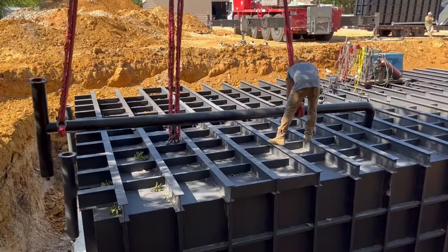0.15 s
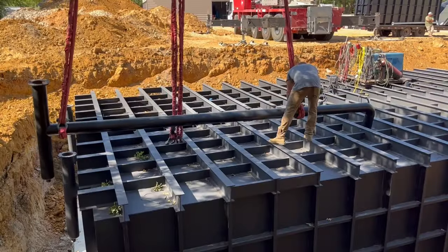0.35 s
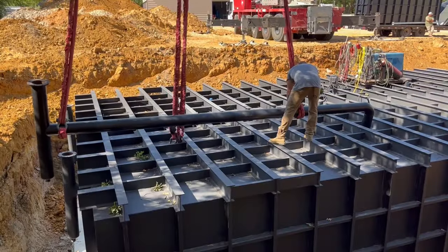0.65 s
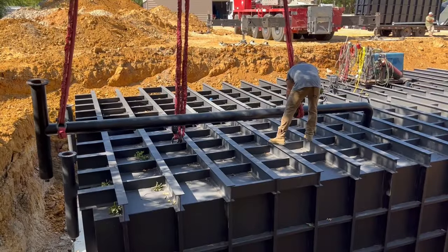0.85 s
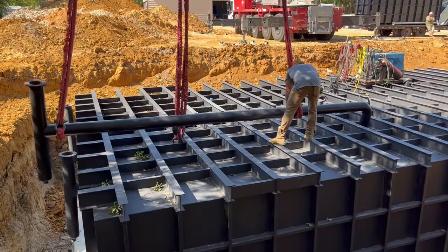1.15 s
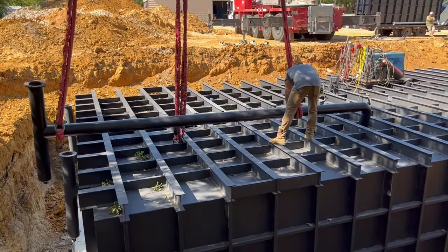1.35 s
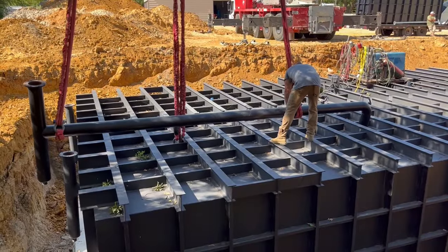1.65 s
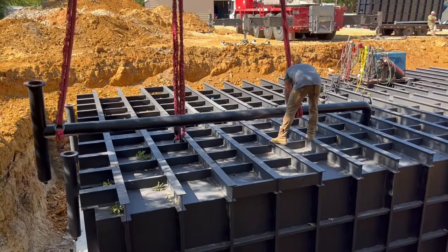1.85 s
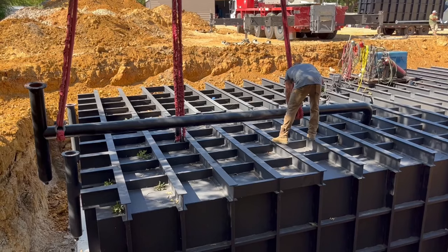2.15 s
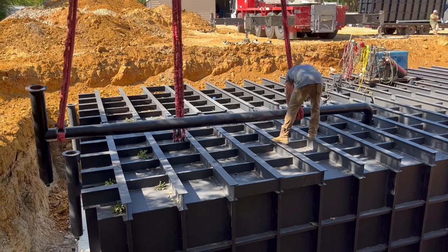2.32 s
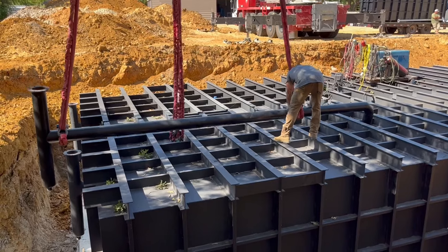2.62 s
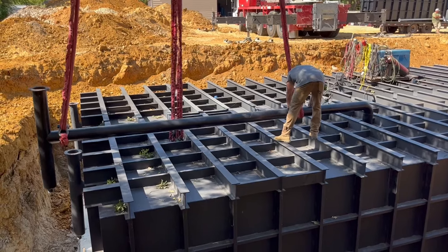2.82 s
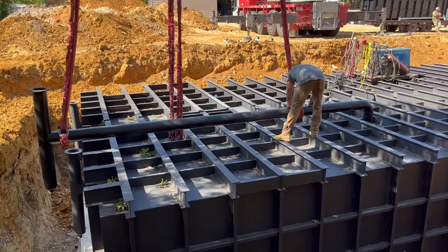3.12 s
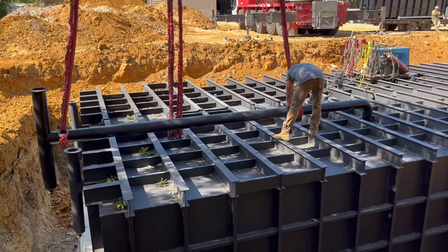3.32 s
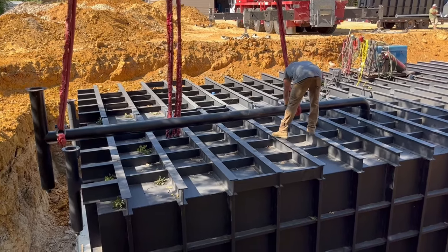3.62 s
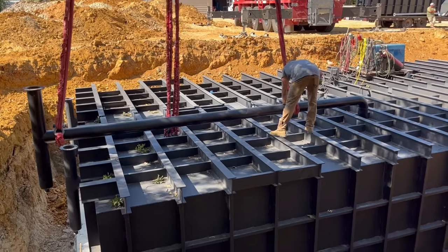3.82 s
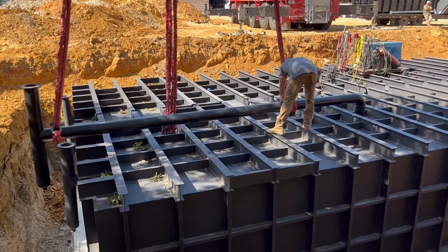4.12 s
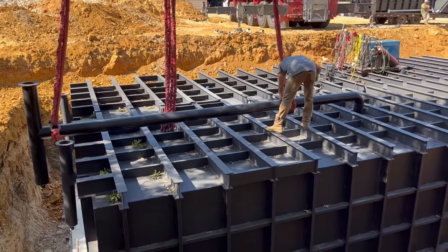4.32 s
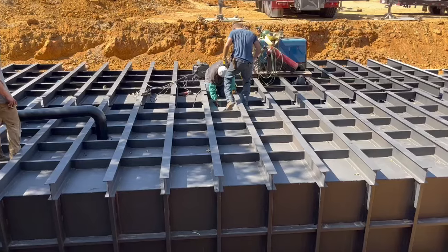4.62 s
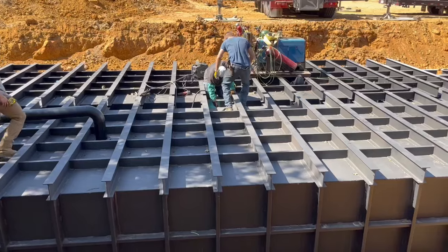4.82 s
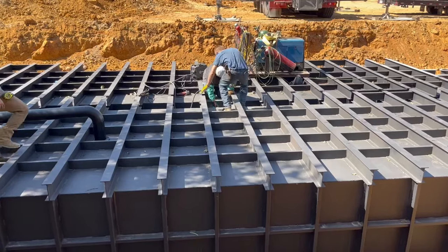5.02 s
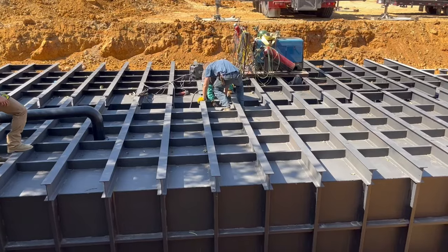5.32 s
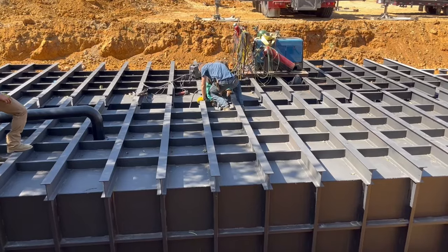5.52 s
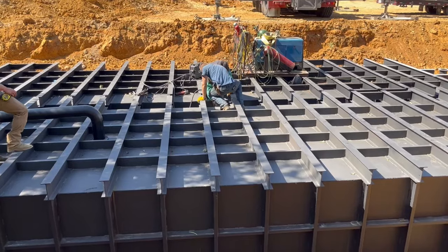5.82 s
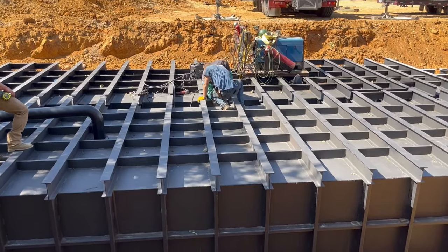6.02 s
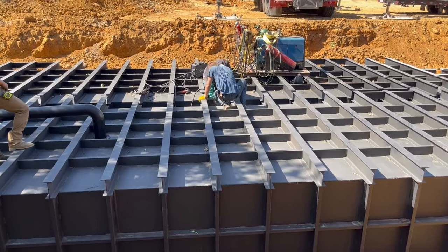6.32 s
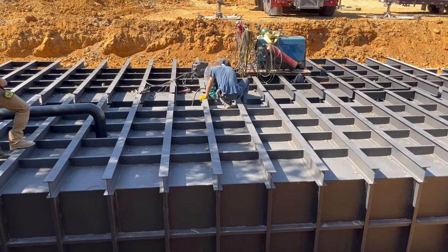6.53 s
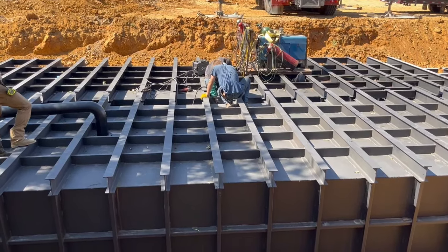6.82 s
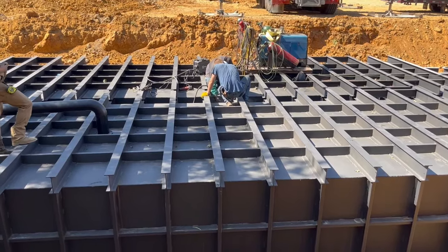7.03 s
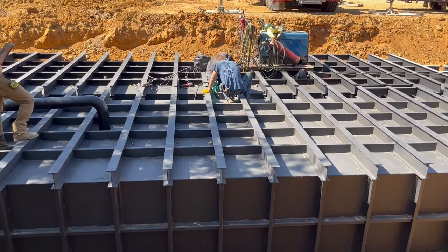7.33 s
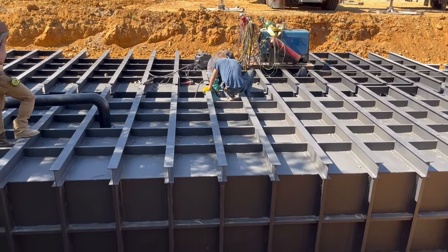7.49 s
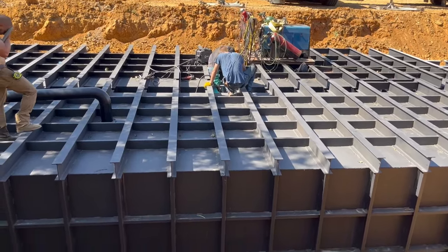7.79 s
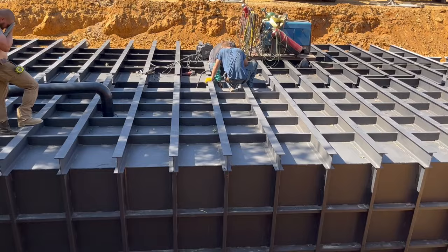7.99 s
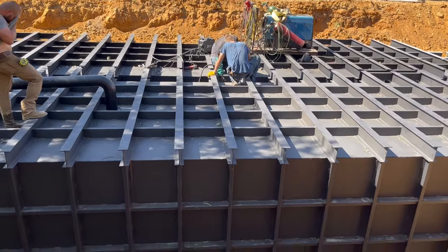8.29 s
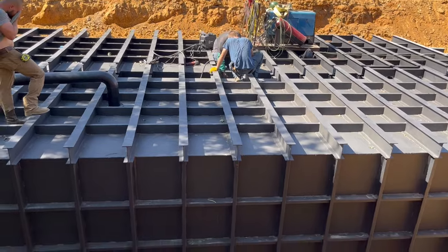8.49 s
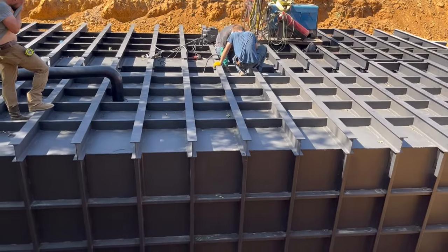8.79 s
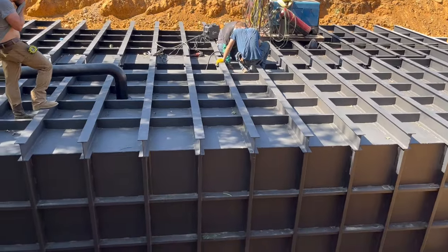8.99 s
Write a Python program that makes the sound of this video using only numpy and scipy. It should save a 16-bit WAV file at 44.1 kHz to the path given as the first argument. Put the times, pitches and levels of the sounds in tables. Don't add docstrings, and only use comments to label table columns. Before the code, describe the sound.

Outdoors in an earth pit, two engines idle steadily across the way while a chain clanks brightly and steel beams bump, with a heavier cluster of hollow thuds a couple of seconds later. A hard cut moves nearer a whining welding generator and crane engine; an arc sputters and pops, stops, resumes for a second bead, and ends with a loud snap. Handheld phone, stereo, little bass or extreme treble.

```python
import sys
import numpy as np
from scipy import signal
from scipy.fft import rfft, irfft
from scipy.io import wavfile
from scipy.ndimage import uniform_filter1d

SR = 44100
rng = np.random.default_rng(int(sys.argv[2]) if len(sys.argv) > 2 else 0)


def log_audio(samples):
    frames = np.atleast_2d(samples).T
    limited = np.clip(frames, -1, 1)
    pcm = np.round(limited * 32767).astype(np.int16)
    wavfile.write(sys.argv[1], SR, pcm)


def linear_from_db(decibels):
    return 10 ** (np.asarray(decibels, float) / 20)


N = 403515
T = np.arange(N) / SR
HZ = np.fft.rfftfreq(N, 1 / SR)
SCENE_CHANGE_S = 4.446


def level(x, db):
    return x * linear_from_db(db) / np.sqrt(np.mean(x ** 2))


def on_log(table):
    hz, value = np.transpose(table)
    return np.interp(np.log(HZ + 1), np.log(hz + 1), value)


def bells(modes):
    return 1 + sum(linear_from_db(db) * 1j * HZ * width / (hz ** 2 - HZ ** 2 + 1j * HZ * width)
                   for hz, width, db in modes)


def walk(rate):
    hold = int(SR / rate)
    steps = np.repeat(rng.standard_normal(N // hold + 1), hold)
    return 1.3 * uniform_filter1d(uniform_filter1d(steps, hold), hold)[:N]


def tone(phase, db, sway_db, drift):
    strength = np.sqrt(2) * linear_from_db(db + sway_db * walk(5))
    return strength * np.sin(phase + drift * walk(4) + 2 * np.pi * rng.random())


def place(starts, sounds):
    out = np.zeros(N + SR)
    for start, sound in zip(starts, sounds):
        first = int(start * SR)
        out[first:first + len(sound)] += sound
    return out[:N]


def die_away(t, t60):
    return np.exp(-np.log(1000) * t / t60)


def burst(t, t60):
    return rng.standard_normal(len(t)) * die_away(t, t60)


def ring(modes, longest, t, scatter=1):
    hz, db, t60 = np.transpose(modes)[:, :, None]
    share_db, detune, phase = rng.standard_normal((3, len(modes), 1))
    swing = np.sin(2 * np.pi * hz * (1 + 0.00094 * detune) * t + scatter * phase)
    y = np.sum(linear_from_db(db + share_db) * die_away(t, np.minimum(t60, longest)) * swing, axis=0)
    return y / np.max(np.abs(y))


def roar(table, covers, db, turn, beat):
    spectrum = rfft(rng.standard_normal((2, N))) * linear_from_db(on_log(table)) * bells(covers)
    puff = 1 + beat * np.cos(2 * turn) + .5 * beat * np.cos(turn + 1)
    out = 0
    for hz in 45 * 2 ** np.arange(9):
        band = np.cos(np.pi / 2 * np.clip(np.log2((HZ + 1) / hz), -1, 1)) ** 2
        out = out + irfft(spectrum * band, N) * linear_from_db(walk(6)) * puff ** min(700 / hz, 1)
    return level(out, db)


# multiple of the shaft turn, level in dB.
FAR_ORDERS = [(2, 2), (3, -8), (4, -34), (5, -1), (6, -2.5), (7, -13.5), (8, -11), (10, -10.5), (11, -11.5),
              (12, -11.5), (13, -22.5), (14, -16.5), (15, -19), (16, -27), (18, -8.5), (19, -23.5),
              (23, -21.5), (24, -13.5), (25, -11.5), (26, -13), (27, -11), (28, -16), (29, -10),
              (31, -15.5), (32, -16.5), (33, -14.5), (36, -18.5), (38, -14)]
# frequency in Hz, level in dB.
CRANE_FAR = [(53.25, -35), (1055, -44), (1147, -51.5), (1420, -48.5), (1815, -51.5)]
# frequency in Hz, level in dB per Hz.
FAR_ROAR = [(30, -6), (70, 5.5), (120, 0), (230, -4), (370, -2.5), (480, -8), (650, -8), (900, -4),
            (1300, -16.5), (2100, -23.5), (3300, -26.5), (4400, -32), (8000, -29.5), (14500, -35.5)]
# frequency in Hz, width in Hz, level in dB.
FAR_COVERS = [(1545, 150, 7.5), (1843, 41, 8), (2660, 730, 3), (4430, 490, 5), (6730, 410, -19)]


def far_spot():
    turn = 2 * np.pi * 30.21 * T
    lines = sum(tone(round(k) * turn, db - 32, 0.85, 0.011 * k) for k, db in FAR_ORDERS)
    crane = sum(tone(2 * np.pi * hz * T, db, 0.15, 0.12) for hz, db in CRANE_FAR)
    return lines + crane, roar(FAR_ROAR, FAR_COVERS, -28.5, turn, 0.17)


# time in seconds, pitch of the slot whine in Hz.
SPEED = [(4.46, 528), (5.14, 528.4), (5.26, 543), (5.4, 542), (6.2, 545.7), (6.3, 545), (7.04, 546.4),
         (7.21, 523.2), (7.33, 520.3), (7.46, 530.4), (8.26, 532.3), (8.33, 534), (8.43, 545),
         (9.03, 544.2), (9.11, 538), (9.15, 522)]
# time in seconds, load from 0 to 1.
LOAD = [
    (4.45, 1),
    (5.2, 0.97),
    (5.45, 0.36),
    (5.8, 0.28),
    (7.05, 0.11),
    (7.25, 0.77),
    (8.3, 1),
    (8.5, 0.38),
    (9.0, 0.29),
    (9.15, 0.46),
]
# multiple of the shaft turn, idle level in dB, gain at full load in dB.
NEAR_ORDERS = [(3, -60, 14), (4, -46, 2.5), (5, -28.5, 6), (6, -29.5, 6.5), (7, -42, 3), (8, -42.5, -3),
               (9.993, -65, -9), (22, -40.5, -7), (25, -43.5, 1), (28, -51, -9), (36, -44, -6.5),
               (51, -43, -5), (57, -51.5, -2.5)]
# frequency in Hz, level in dB.
CRANE_NEAR = [(76.7, -32.5), (87.8, -42), (134.2, -39.5), (153.4, -33.5), (383.2, -40), (1035, -45),
              (2070, -49)]
# frequency in Hz, level in dB per Hz.
NEAR_ROAR = [(30, -10), (70, -13), (105, -6), (200, -7), (400, -7), (620, -6), (850, -15), (1050, -12),
             (1300, -19.5), (2000, -20), (3300, -26.5), (4400, -33), (8000, -33.5), (14500, -37.5)]
# frequency in Hz, width in Hz, level in dB.
NEAR_COVERS = [(1417, 136, 2.5), (2060, 980, -18.5), (4430, 800, 4.5), (7340, 540, -19.5)]


def near_spot():
    slots = 18
    turn = np.cumsum(2 * np.pi * np.interp(T, *np.transpose(SPEED)) / slots / SR)
    load = np.clip(np.interp(T, *np.transpose(LOAD)), 0, 1)
    boom = tone(2 * turn, -46.5 + 23 * np.sqrt(load), 0.94, .03)
    lines = sum(tone(round(k) * turn, db + gain_db * load, 1.0, 0.02 * k)
                for k, db, gain_db in NEAR_ORDERS)
    whine = tone(slots * turn, -26 - 2.5 * load, 1.2, 0.2)
    eased = np.clip((T - 7.6) / 0.16, 0, 1)
    housing_panel = tone(14 * turn, -38 - 7.5 * load + 5 * eased, 2., .2)
    pistons = 2 * np.pi * 343.7 * T
    pump = tone(pistons, -36 - 36 * eased, 1.2, 0.15)
    pump = pump + tone(2 * pistons, -40 + 5 * load, 2.9, 0.13)
    crane = sum(tone(2 * np.pi * hz * T, db, 1.6, hz / 1500) for hz, db in CRANE_NEAR)
    noise = roar(NEAR_ROAR, NEAR_COVERS, -28, turn, 0.096) * linear_from_db(0.84 * load)
    return boom + lines + whine + housing_panel + pump + crane, noise


def pit(x, t60, wet_db):
    t, dull = T[:SR // 2], signal.butter(2, 1800, fs=SR)
    wash = [signal.lfilter(*dull, burst(t, t60)) * (t > .006) for _ in range(2)]
    wet = np.array([signal.fftconvolve(x, w / np.linalg.norm(w))[:N] for w in wash])
    return linear_from_db(wet_db) * wet + np.array([x, linear_from_db(-11) * np.roll(x, 40)])


def blows(table, modes, longest, rattle_db, rattle_s, slap_db):
    t, sounds = T[:SR // 2], []
    for _, db, contact_ms, ring_db, *panel_hz in table:
        push = np.hanning(int(contact_ms * SR / 1000) + 3)
        struck = [(hz, mode_db - 10 * sum(abs(np.log2(hz / p)) for p in panel_hz), t60)
                  for hz, mode_db, t60 in modes]
        body = linear_from_db(ring_db) * ring(struck, longest, t, 0.39) * (1 - np.exp(-t / 0.0018))
        body = body + linear_from_db(rattle_db) * burst(t, rattle_s)
        body = np.convolve(body, push / push.sum())[:len(t)]
        body[:len(push)] += linear_from_db(slap_db - 0.3 * contact_ms) * push
        sounds.append(linear_from_db(db + 0.5) * body)
    return place([row[0] for row in table], sounds)


# start in seconds, peak in dB, contact in ms, ring in dB, struck panel pitch in Hz.
THUDS = [(.30, -11.5, 1.3, -8, 300), (.55, -19, 1.2, 5, 450), (.81, -16, 1.9, 2, 400),
         (2.287, -7, 1.6, -0.5, 200), (2.32, -15.5, 2, 0, 380), (2.345, -14.5, 1.2, 3, 400),
         (2.40, -10, 1.4, -3, 210), (2.412, -11, 0.87, 3, 400), (2.425, -15, 4.6, 1, 75),
         (2.455, -10.5, 1.3, 2.5, 290), (2.49, -13, 2.5, 0, 70), (2.52, -17, 1.25, 3, 403),
         (2.546, -10, 0.77, 0, 280), (2.585, -17, 1.9, 2, 140), (2.63, -22, 1.1, -1, 330),
         (2.677, -11, 6, 1.5, 73), (2.74, -17, 1.5, 1, 290), (2.79, -25, 6, 1, 70),
         (2.88, -15.5, 6.3, -4, 70), (3.0, -20, 5.6, 1, 70), (3.15, -21, 7.6, -2, 70)]
# frequency in Hz, level in dB, t60 in seconds.
FRAME = [(61.8, -9, 0.25), (73.5, -2.5, 0.22), (95, -10, 0.1), (140, -4, 0.18), (202, -0.5, 0.17),
         (263, -0.5, 0.18), (297.3, 2, 0.21), (380, -2, 0.26), (420, -2, 0.12), (463, -3, 0.19),
         (741, -3, 0.14), (980, -4, 0.13)]


def frame_thuds():
    return blows(THUDS, FRAME, .4, -2.5, 0.15, 0)


# start in seconds, peak in dB, contact in ms, ring in dB.
BUMPS = [(.42, -8.5, 0.41, 5.5), (.431, -9, 0.46, 1), (.445, -14, 0.47, -7), (.462, -31, 0.61, -9),
         (.548, -8.5, 1.35, -4), (.59, -13, 1.1, -10), (.669, -27, 0.69, -11), (.702, -16.5, 0.66, -8),
         (.799, -17, 0.49, 3), (.865, -23, 0.42, -11), (.986, -19, 0.6, -6), (1.165, -18.5, 0.62, -2.5),
         (2.348, -11, 0.41, -1), (2.365, -18, 0.37, -16), (2.41, -12, 0.46, -10), (2.45, -14, 0.52, -6)]
# frequency in Hz, level in dB, t60 in seconds.
BEAM = [(404, -6.5, 0.66), (592, -14, 5.0), (854, 0, 0.22), (993, 1, 0.42), (1130, -33, 0.88),
        (1280, -10, 0.47), (1670, -11, 0.17), (1750, -38, 0.38), (1825, -17, 0.18), (2400, -19, 0.44),
        (2540, -27, 0.15), (3250, -31, 0.69)]


def beam_bumps():
    return blows(BUMPS, BEAM, 0.084, 0.57, 0.13, -2.1)


# start in seconds, then peak, big link, small link and hook in dB.
LINKS = [
    (.047, -13, -40, -40, 3.5),
    (0.057, -15, -40, -42, 2),
    (.061, -1.5, -10, -2.5, -3),
    (.068, -8.5, 0, -15, -6),
    (.107, -5, -14, -7, -13),
    (.135, -8.5, -40, -26, -20),
    (.177, -9.5, 0.5, -2, 3),
    (.19, -10, -27, -3.5, 0),
    (.215, -12.5, -4, 1.5, -2),
    (0.268, -12, -4.5, -11, -14),
]
# frequency in Hz, level in dB, t60 in seconds.
BIG_LINK = [(3040, -5, .6), (3152, -7, 0.3), (3898, -14, .3), (4690, 2, 0.9), (4786, -12, .4),
            (9905, -8, .5), (13370, -17, 0.4)]
# frequency in Hz, level in dB, t60 in seconds.
SMALL_LINK = [(6225, -2, 0.3), (6620, 1, 0.3), (7140, -14, 0.44), (10610, -18, 0.46), (11720, -1, 0.14),
              (14300, -26, .3)]
# frequency in Hz, level in dB, t60 in seconds.
HOOK = [(371, -11, 0.37), (753, -11, 0.15), (919, -3, 0.081), (946, -1, 0.11), (1106, -17, .12),
        (1720, -13, 0.11), (1725, -12, 0.072), (2128, 1, 0.082), (2310, -1, 0.05), (2570, -2, 0.091),
        (2930, -12, 0.073)]
# frequency in Hz, level in dB per Hz.
CLATTER = [(120, -43), (200, -4), (480, 2), (650, -8), (953, 2.5), (1540, -11), (4330, -17), (4680, -22),
           (6870, -17), (9000, -69), (11700, -101), (19800, -120)]
# frequency in Hz, level in dB, t60 in seconds.
SHACKLE = [(3150, -4, .3), (4700, -7, .5), (6220, 0, .22), (6640, -2, .22), (7150, -12, .2)]


def chain():
    t, hook, links, rough = T[:SR // 2], [], [], []
    free = np.clip((0.076 - t) / .02 + 1, 0, 1) * (1 - np.exp(-t / .003))
    for _, db, big_db, small_db, hook_db in LINKS:
        both = linear_from_db(big_db) * ring(BIG_LINK, 0.74, t) + linear_from_db(small_db) * ring(SMALL_LINK, .6, t)
        links.append(linear_from_db(db - 12.0) * free * both)
        hook.append(linear_from_db(db + hook_db - 3.0) * ring(HOOK, 0.35, t, .2))
        rough.append(linear_from_db(db) * burst(t, 0.07) * (1 - np.exp(-t / 0.0034)))
    start = np.transpose(LINKS)[0]
    shackle = place([2.432], [linear_from_db(-28) * free * ring(SHACKLE, 0.49, t)])
    flutter = linear_from_db(2.2 * walk(61.7))
    clatter = irfft(rfft(place(start, rough)) * linear_from_db(on_log(CLATTER)), N)
    return place(start, hook) + (place(start, links) + shackle) * flutter + linear_from_db(9) * clatter


# frequency in Hz, width in Hz, level in dB.
COLD_PLATE = [(1720, 45, 0), (2200, 70, -5), (1440, 60, -5)]


def cold_plate():
    since = np.maximum(T - SCENE_CHANGE_S, 0)
    hum = irfft(rfft(rng.standard_normal((2, N))) * (bells(COLD_PLATE) - 1), N)
    return level(hum, -37) * die_away(since, 1.5)


def snap(t):
    return np.diff((t == 0) + .12 * burst(t, .006), prepend=0)


# start in seconds, length in seconds, sizzle at start and at end in dB.
WELDS = [
    (4.44, 0.16, -45.5, -42.5),
    (4.587, .52, -50, -51),
    (7.058, 0.18, -53, -58),
    (7.24, 0.31, -47, -47.5),
    (7.515, .66, -49.5, -52),
    (8.128, .125, -47, -45),
    (9.059, 0.12, -56, -58),
]
# start in seconds, peak in dB.
SNAPS = [
    (4.448, -34),
    (4.602, -19),
    (4.915, -13),
    (5.078, -23),
    (7.243, -18),
    (7.389, -18),
    (7.862, -19),
    (9.0606, 0.5),
]
# start in seconds, treble peak in dB, body below treble in dB.
POPS = [(4.4463, -21, -5), (4.4564, -27, -7), (4.4722, -18, -4), (4.4947, -24, -6), (4.5075, -25, -2),
        (4.5164, -22, -5), (4.547, -21, -7), (4.5594, -24, -4), (4.5835, -23, -8), (4.6009, -15.5, -11),
        (4.6433, -26, -7), (4.6678, -15.5, -9), (4.6856, -22.5, 2.5), (4.7027, -22, -7),
        (4.7451, -19.5, 0.5), (4.77, -25, -4), (4.7804, -26, -3), (4.797, -23, -5), (4.8155, -29, -1),
        (4.8384, -29, -5), (4.8628, -20, -13), (4.8754, -22, -11), (4.9125, -16, -13), (4.9412, -29, -1),
        (4.9586, -24, -4), (4.982, -19, -4), (5.0155, -23.5, -2), (5.0264, -22, -4), (5.0504, -30, 1),
        (5.077, -25, 2.5), (5.0954, -28, 1),
        (6.9574, -34, 9), (7.0698, -36, -3), (7.1197, -28, -1), (7.1671, -31, -2),
              (7.2419, -12.5, -15.5), (7.2611, -24, -8), (7.3387, -27, -3), (7.365, -23, -4),
              (7.3876, -13.5, -10.5), (7.485, -36, -5), (7.5857, -23, -6), (7.6107, -25, -5),
              (7.6203, -19.5, -9), (7.67, -19.5, -9), (7.6943, -19, -11), (7.7124, -21, -12),
              (7.738, -20.5, -5), (7.7619, -25, -4), (7.7744, -19.5, -8), (7.8105, -29, -5),
              (7.861, -14.5, -11.5), (7.9079, -23, -6), (7.9299, -23, -7), (7.9414, -23, -2),
              (7.958, -22, -4), (7.9653, -16, -13), (7.9806, -20, -3.5), (8.0252, -23, -8),
              (8.0394, -30, -2), (8.0686, -23, -7), (8.1105, -28, 5), (8.1447, -19, -14),
              (8.1533, -21, -11), (8.1618, -19, -12), (8.1951, -21, -3), (8.2044, -20, -7),
              (8.2217, -21, -7), (8.2314, -24, -5), (8.2404, -23, -7), (9.0592, -15.5, -25),
              (9.1232, -27, -4), (9.1424, -26, -7)]
# frequency in Hz, level in dB.
ARC = [(1200, 6), (1700, 0), (2300, -2), (3000, 1), (3900, -3.5), (5000, -2.5), (6500, -3), (8000, 1),
       (10000, -3.5), (11600, -6), (14000, -3.5), (15500, -1)]
# frequency in Hz, width in Hz, level in dB.
PLATES = [(1727, 90, 11), (2200, 120, 7), (3700, 150, 6), (4340, 260, 6), (6470, 400, -3), (10000, 500, 0),
          (13500, 300, 2)]


def sizzle_db():
    stretches = []
    for start, length, first_db, last_db in WELDS:
        end = start + length
        stretches.append(np.interp(T, [start, start + 0.027, end - .02, end],
                                   [first_db + 2, first_db, last_db, last_db - 5], left=-120, right=-120))
    return np.max(stretches, axis=0)


def small_pops(flow_db):
    s = (np.arange(9 * 36) + rng.random(9 * 36)) / 36
    db = np.interp(s, T, flow_db) + 14 + 3.5 * rng.standard_normal(len(s))
    start, length = np.transpose(WELDS)[:2, :, None]
    burning = np.any((s > start) & (s < start + length), axis=0)
    return np.transpose([s, db, np.full(len(s), -6)])[burning]


def pop(t, db, body_db):
    noise = rng.standard_normal((2, len(t))) * (1 - np.exp(-t / 0.00062))
    dull = signal.lfilter([.5], [1, -.5], noise)
    longer = np.exp(0.14 * (db + 20))
    tail = linear_from_db(-15) * die_away(t, 0.064)
    body = linear_from_db(db + body_db - 2) * dull * (die_away(t, 0.066 * longer) + tail)
    treble = linear_from_db(db - 5) * (noise - dull) * (die_away(t, 0.028 * np.sqrt(longer)) + tail)
    return body + treble


def arc():
    flow_db = sizzle_db()
    flow = linear_from_db(flow_db + 0.9 * walk(10))
    grain = np.minimum(rng.exponential(size=N // 64 + 1), 4).repeat(64)[:N]
    sparks = rng.standard_normal((2, N)) * linear_from_db(2.2 * grain + 2.0 * walk(70))
    every = np.vstack([POPS, small_pops(flow_db)])
    t = T[:SR // 10]
    pops = [pop(t, db, body_db) for _, db, body_db in every]
    raw = level(sparks, 9.3) * flow + [place(every[:, 0], one) for one in np.swapaxes(pops, 0, 1)]
    raw[0] += place(np.transpose(SNAPS)[0], [linear_from_db(db) * snap(t) for _, db in SNAPS])
    low_cut = HZ ** 2 / (HZ ** 2 + 1100 ** 2)
    return irfft(rfft(raw) * linear_from_db(on_log(ARC) + 5.0) * bells(PLATES) * low_cut, N)


# frequency in Hz, likeness from 0 to 1.
PORT_LIKE = [(60, 0.95), (250, 0.99), (600, 0.83), (1300, 0.6), (2000, .95), (2800, 0.62), (4200, 0.68),
             (5400, .3), (6500, 0.75), (8300, 0.985), (10200, .88), (11700, 0.995), (13500, .9),
             (15500, 0.97)]
# frequency in Hz, phase in radians.
PORT_LEAD = [(0, 0), (150, -.12), (1210, -.5), (1550, -1.5), (1810, -.2), (2930, .6), (4390, .7),
             (4900, .8), (5510, -.6), (7580, -2.5), (8270, -3.14), (8960, -3.65), (11100, -5.8),
             (11800, -6.28), (12500, -6.5), (14470, -8.6), (15200, -9.1), (16100, -9.5)]
# frequency in Hz, left minus right in dB.
PORT_BALANCE = [(60, .5), (150, .9), (400, .5), (1000, -.2), (2400, -.3), (4400, 1), (5400, 1), (6200, 4),
                (7200, 1), (8000, 0)]


def two_ports(alike, apart):
    like = np.clip(on_log(PORT_LIKE), 0, 1)
    lead = np.exp(.5j * np.interp(HZ, *np.transpose(PORT_LEAD))) * linear_from_db(on_log(PORT_BALANCE) / 2)
    common = rfft(alike) * np.sqrt((1 + like) / 2)
    scattered = rfft(apart) * np.sqrt((1 - like) / 2)
    return irfft(np.array([(common + scattered) * lead, (common - scattered) / lead]), N)


def scene():
    near = T >= SCENE_CHANGE_S
    far_lines, far_roar = far_spot()
    near_lines, near_roar = near_spot()
    steel = pit(chain() + beam_bumps() + frame_thuds(), 0.53, -8.5)
    lines = np.where(near, near_lines, far_lines)
    noise = np.where(near, near_roar + arc() + cold_plate(), far_roar)
    alike, apart = noise + steel + np.array([lines, 0.026 * np.roll(lines, 150)])
    return two_ports(alike, apart)


def roll_off(x):
    return signal.sosfilt(signal.butter(12, 16500, fs=SR, output="sos"), x)


def record(dry):
    bass_cut = signal.butter(3, 42, "high", fs=SR, output="sos")
    top_cut = signal.ellip(8, .2, 30, 15800, fs=SR, output="sos")
    mix = signal.sosfilt(np.vstack([bass_cut, top_cut]), dry)
    return roll_off(mix)


dry = scene()
out = record(dry)
log_audio(out)
```